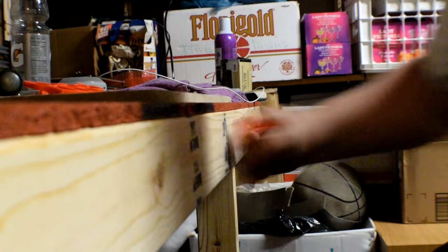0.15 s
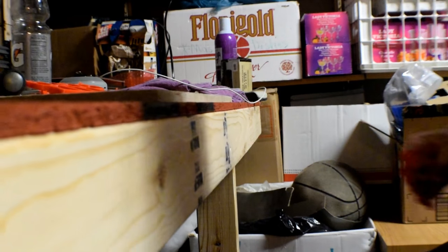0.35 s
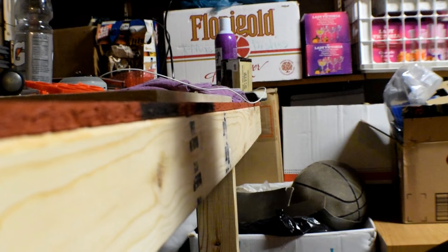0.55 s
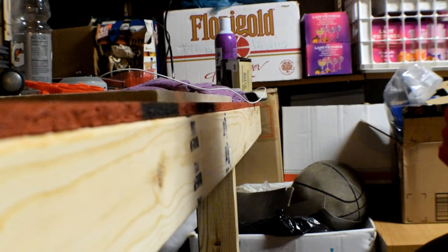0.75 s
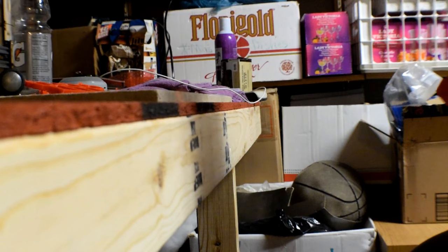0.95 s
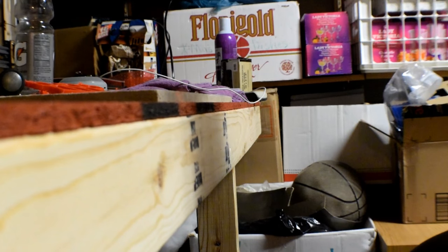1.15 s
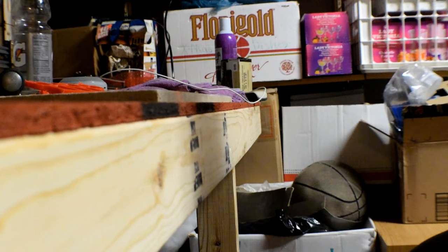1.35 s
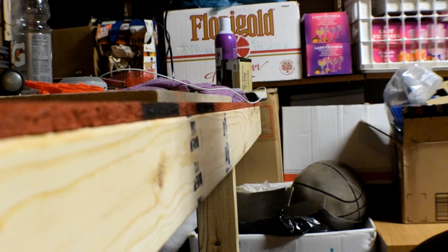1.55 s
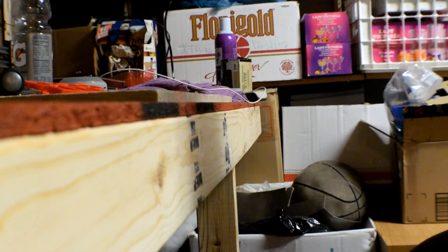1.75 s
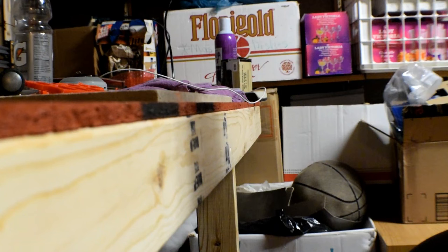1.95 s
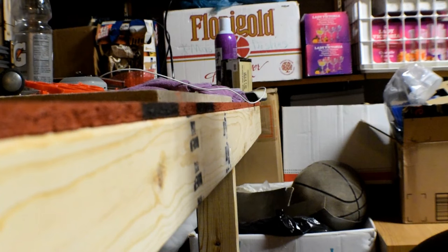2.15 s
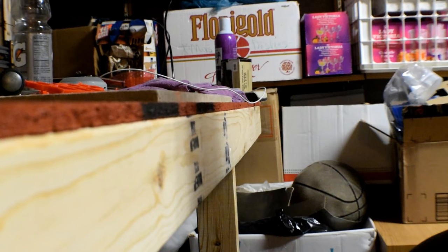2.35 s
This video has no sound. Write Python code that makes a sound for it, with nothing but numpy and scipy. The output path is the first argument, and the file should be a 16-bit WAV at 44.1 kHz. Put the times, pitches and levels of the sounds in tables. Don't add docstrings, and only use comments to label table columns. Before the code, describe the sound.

A fist punches a bench-mounted wooden board with a loud, overloaded smack, then clutter rattles and settles

```python
import sys
import numpy as np
from scipy import signal
from scipy.io import wavfile
from scipy.ndimage import uniform_filter1d

SR = 44100
rng = np.random.default_rng(int(sys.argv[2]) if len(sys.argv) > 2 else 0)


def wav_out(sig):
    wavfile.write(sys.argv[1], SR, np.round(np.clip(np.atleast_2d(sig).T, -1, 1) * 32767).astype(np.int16))


def attenuation_scalar(level_db):
    decades = np.asarray(level_db, float) / 20
    return 10 ** decades


N = 105840
T_S = np.arange(N) / SR
PUNCH_S = 0.2254
BANDS_HZ = 30 * 2 ** np.arange(0, 9.3, 0.5)


def unit(x):
    return x / np.sqrt(np.mean(x ** 2))


def noise():
    return rng.standard_normal(N)


def read(table, hz):
    table_hz, values = np.array(table).T
    return np.interp(np.log(hz), np.log(table_hz), values)


def band(x, hz, width_hz):
    low = max(hz - width_hz / 2, 10)
    high = min(hz + width_hz / 2, 0.49 * SR)
    return signal.sosfilt(signal.butter(2, [low, high], "band", fs=SR, output="sos"), x)


def walk(rate_hz):
    hold = int(SR / rate_hz)
    steps = np.repeat(rng.standard_normal(N // hold + 1), hold)
    return unit(uniform_filter1d(uniform_filter1d(steps, hold), hold)[:N])


def ring(force, hz, t60_s):
    pole = np.exp(2j * np.pi * hz / SR - np.log(1000) / (t60_s * SR))
    return signal.lfilter([1], [1, -pole], force).imag


def push(start_s, contact_s):
    force = np.sin(np.pi * np.clip((T_S - start_s) / contact_s, 0, 1))
    return force / force.sum()


def fade(start_s, t60_s):
    t = T_S - start_s
    return (t >= 0) * np.exp(-np.log(1000) * np.maximum(t, 0) / t60_s)


# band_hz, density_db_per_hz
HUM_SPECTRUM = [(25, -19), (55, 5.5), (90, -3.5), (150, -1.5), (450, -5), (1000, -17), (2500, -32),
                (6000, -40.5), (16000, -52)]


def hum():
    hum_db, fan_db, fan_hz, fan_width_hz = -42.5, -70, 1790, 37
    swell = walk(1.0)
    air = 0
    for hz in BANDS_HZ:
        level_db = read(HUM_SPECTRUM, hz) + 0.13 * swell + 1.46 * walk(15)
        air = air + attenuation_scalar(level_db) * band(noise(), hz, hz / 3)
    whine = unit(band(noise(), fan_hz, fan_width_hz))
    return attenuation_scalar(hum_db) * unit(air) + attenuation_scalar(fan_db) * whine


# band_hz, t60_s
ROOM_DECAY = [(60, 1.7), (200, 0.73), (600, 0.33), (2000, 0.5052), (6000, 0.52), (14000, 0.5)]
# band_hz, level_db
ROOM_COLOUR = [(60, -9), (200, -16), (600, -11), (2000, -9), (6000, -11), (14000, -17.5)]


def room(x):
    gap_s = 0.0044
    tail = 0
    for hz in BANDS_HZ:
        part = band(noise(), hz, hz / 3) * fade(gap_s, read(ROOM_DECAY, hz))
        tail = tail + attenuation_scalar(read(ROOM_COLOUR, hz)) * part / np.sqrt(np.sum(part ** 2) * SR / hz)
    return signal.fftconvolve(x, tail[:SR])[:N]


def swish():
    swish_db, swish_hz, peak_s, rise_s, fall_s = -45.5, 1860, 0.064, 0.12, 0.024
    rustle_db, rustle_hz = -53.5, 1570
    t = T_S - peak_s
    shape = np.exp(-0.5 * (t / np.where(t < 0, rise_s, fall_s)) ** 2)
    air = unit(band(noise(), swish_hz, 1.45 * swish_hz)) * shape
    cloth = band(noise(), rustle_hz, 1.8 * rustle_hz) + 0.18 * band(noise(), 8300, 9000)
    rustle = unit(cloth) * (T_S < PUNCH_S)
    return attenuation_scalar(1.2 * walk(53)) * (attenuation_scalar(swish_db) * air + attenuation_scalar(rustle_db) * rustle)


# start_s, level_db, t60_s
SHAKE_BURSTS = [
    (.226, -9, 0.2),
    (.368, -24.5, .2),
    (.521, -34.5, .15),
]


def clutter():
    clacks_per_s, scatter_db, level_db, t60_s = 4000, 1, -45.5, 2.47
    shake = attenuation_scalar(level_db) * fade(PUNCH_S, t60_s)
    for start_s, burst_db, burst_t60_s in SHAKE_BURSTS:
        shake = shake + attenuation_scalar(burst_db) * fade(start_s, burst_t60_s)
    happens = rng.random(N) < clacks_per_s / SR
    strength = attenuation_scalar(-scatter_db * np.log(rng.random(N) + 1e-9))
    clacks = happens * strength * shake
    which = rng.integers(0, 8, N)
    # pitch_hz, level_db
    rings = [(400, 7.5), (700, 12), (1100, 12), (1700, 8), (2700, 5), (4300, 3), (6800, -3), (10500, -31)]
    out = 0
    for k, (hz, ring_db) in enumerate(rings):
        out = out + attenuation_scalar(ring_db) * band(ring(clacks * (which == k), hz, 6 / hz), hz, 1.23 * hz)
    return out


# start_s, level_db, centre_hz, t60_s
TICK_EVENTS = [(0.2333, -12, 6950, 0.023), (0.246, -21.5, 5400, 0.13), (.377, -48, 8500, 0.12),
               (.4358, -52, 8000, .03), (.482, -51, 5500, .02), (0.5257, -34, 5770, 0.021),
               (.532, -53, 6500, 0.21), (.5575, -41.5, 6450, 0.011), (.697, -54.5, 5500, 0.044),
               (.7432, -56, 8500, 0.023), (0.7647, -51, 6400, 0.022), (.822, -63, 9520, 0.23),
               (.843, -51.5, 6450, .025), (0.899, -55, 3800, 0.029)]


def ticks():
    grain_db = 1.5
    grit = noise() * attenuation_scalar(grain_db * walk(900))
    out = 0
    for start_s, level_db, hz, t60_s in TICK_EVENTS:
        out = out + attenuation_scalar(level_db) * unit(band(grit, hz, 0.88 * hz)) * fade(start_s, t60_s)
    return out


def chatter():
    start_s, period_s, level_db = 0.6605, 0.00568, -13
    force = sum(gain * push(start_s + k * period_s, 0.0017) for k, gain in enumerate([0.9, 0.9, 1.3]))
    moving = 1 - np.clip((T_S - start_s - 2.34 * period_s) / 0.0037, 0, 1)
    foot = ring(-force, 200, 0.029)
    body = 0.45 * ring(force, 367, 0.024) + 0.22 * ring(force, 560, 0.03)
    return attenuation_scalar(level_db) * moving * (foot + body)


# pitch_hz, level_db, t60_s
ROCKER_MODES = [(877, -1.5, 0.035), (1160, -1, 0.015), (1312, -3.5, 0.04), (1420, -3, 0.028),
                (1650, -5.5, 0.033), (1875, -5.5, 0.049), (2033, -9.5, 0.018), (2330, -2, 0.01),
                (2870, -28, 0.017), (3390, -19, 0.035)]
# start_s, level_db
ROCKER_KNOCKS = [(0.5257, -29.5), (.542, -34), (.638, -40.5), (0.658, -31), (0.7673, -38), (0.9214, -30.5),
                 (1.1855, -34.5), (1.196, -37), (1.3443, -36), (1.46, -46), (1.4727, -34), (1.5501, -35),
                 (1.6234, -41), (1.6636, -40), (1.728, -45.5), (1.755, -43), (1.816, -44.5), (1.8966, -47)]


def rocker():
    knock_db, smear_s, grit_db = -7, 0.017, 0.5
    shapes = [attenuation_scalar(db + knock_db) * fade(start_s, 7 * smear_s) for start_s, db in ROCKER_KNOCKS]
    knocks = np.array(shapes) * noise()
    reach = attenuation_scalar(1.3 * rng.standard_normal((len(ROCKER_KNOCKS), len(ROCKER_MODES))))
    body = 0
    for k, (hz, level_db, t60_s) in enumerate(ROCKER_MODES):
        body = body + attenuation_scalar(level_db) * ring(reach[:, k] @ knocks / 15, hz, t60_s)
    grit = band(knocks.sum(axis=0), 1340, 2000)
    return band(body + attenuation_scalar(grit_db) * grit, 1900, 2700)


# pitch_hz, level_db, t60_s
BOARD_MODES = [(97.7, -13, 0.28), (150.5, -5.5, .16), (174, -1.5, 0.11), (248, 1, 0.12), (303.8, -3, 0.14),
               (349, -2.5, 0.14), (435.3, -5, 0.12), (502.4, 2, 0.09), (649.6, -9.5, 0.22), (761, -1, 0.11),
               (895, -3.5, 0.12), (931, 0, 0.15), (1040, -16, 0.079), (1340, -18, 0.069)]
# start_s, level_db, contact_s
REBOUNDS = [(0.26, 5, 0.0018), (0.273, -4.5, 0.0023), (0.302, -1, 0.0037), (.365, -4, .0022),
            (.392, -16, 0.0034), (0.416, -27.5, 0.0016), (.520, -27.5, 0.00085), (0.602, -18, 0.0058),
            (.73, -22, 0.0028), (.838, -28.5, 0.0017), (1.02, -27.5, 0.0019)]


def board():
    punch_db, contact_s = 13.5, 0.001335
    smack_db, smack_hz, smack_t60_s = -3, 1470, 0.055
    hits = [(PUNCH_S, punch_db, contact_s)] + list(REBOUNDS)
    forces = np.array([attenuation_scalar(db) * push(start_s, length_s) for start_s, db, length_s in hits])
    size = (len(hits), len(BOARD_MODES))
    reach = rng.uniform(0.39, 1, size) * rng.choice([-1, 1], size)
    wood = 0
    for k, (hz, level_db, t60_s) in enumerate(BOARD_MODES):
        wood = wood + attenuation_scalar(level_db) * ring(reach[:, k] @ forces, hz, t60_s)
    smack = unit(band(noise(), smack_hz, 1.52 * smack_hz)) + 0.24 * noise()
    return 0.5 * wood + attenuation_scalar(smack_db) * smack * fade(PUNCH_S, smack_t60_s)


def scene():
    near = board() + clutter() + rocker() + ticks()
    return (near + room(near) + chatter() + swish() + hum())[None]


def high_pass(x, hz):
    return signal.lfilter(*signal.butter(1, hz, "high", fs=SR), x)


def roll_off(x):
    return signal.sosfilt(signal.butter(12, 17980, fs=SR, output="sos"), x)


def record(dry):
    bass_cut_hz, mic_top_hz, clip, sag_hz, top_hz = 52, 11300, 0.38, 6.6, 16300
    mic = signal.lfilter(*signal.butter(1, mic_top_hz, fs=SR), high_pass(dry, bass_cut_hz))
    clipped = mic / (1 + np.abs(mic / clip) ** 10) ** (1 / 10)
    sagged = high_pass(clipped, sag_hz)
    out = signal.sosfilt(signal.ellip(6, 0.2, 30, top_hz, fs=SR, output="sos"), sagged)
    return roll_off(out)


dry = scene()
out = record(dry)
wav_out(out)
```